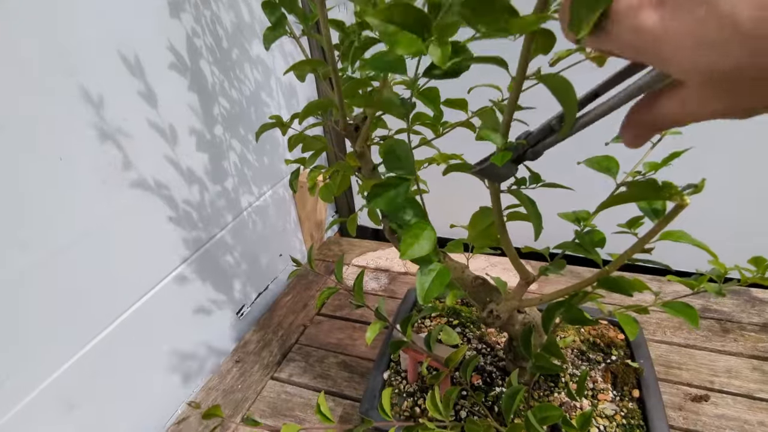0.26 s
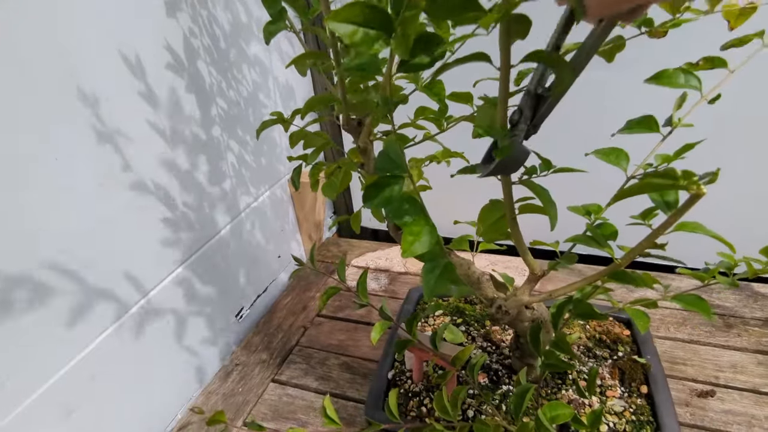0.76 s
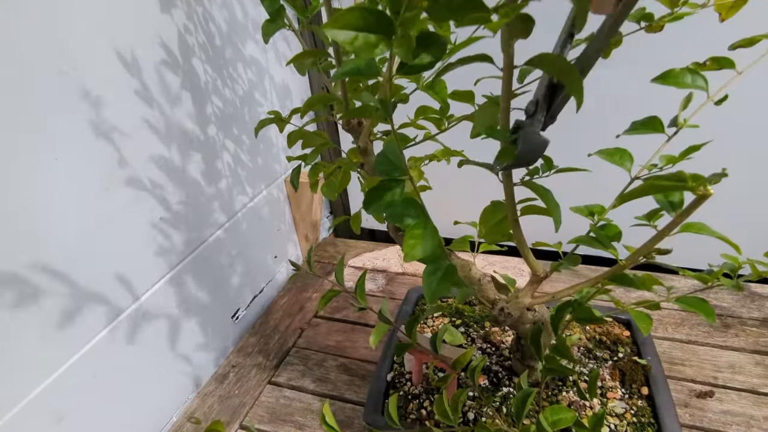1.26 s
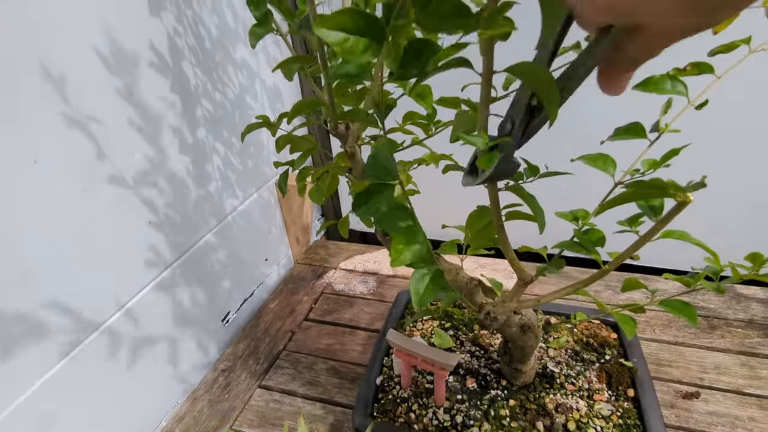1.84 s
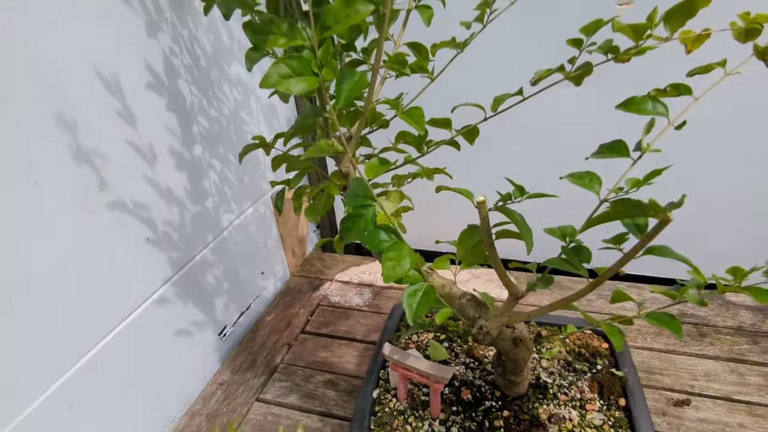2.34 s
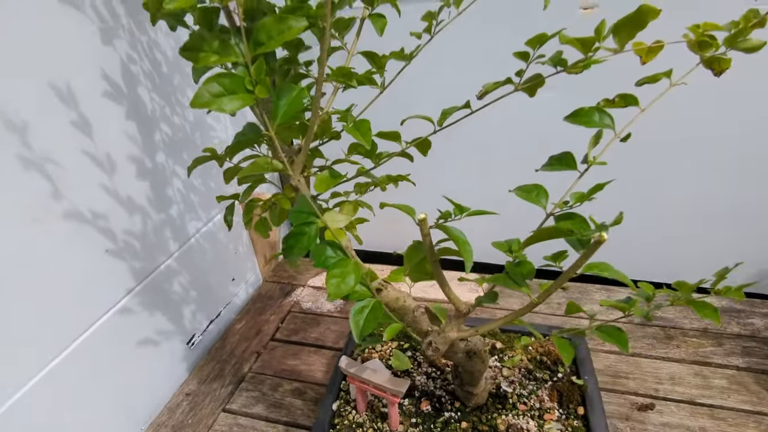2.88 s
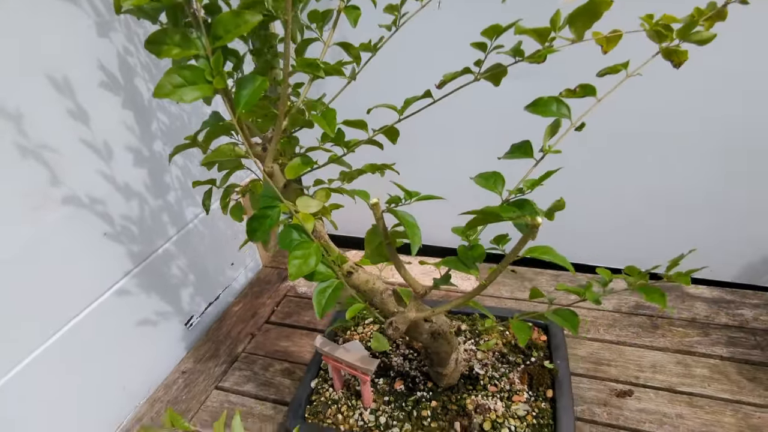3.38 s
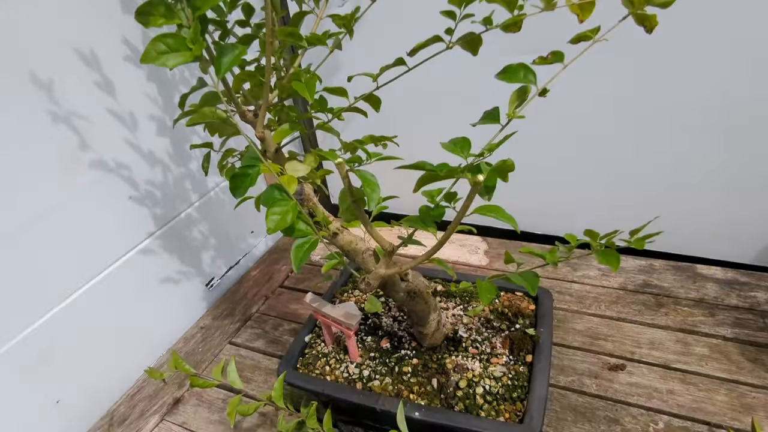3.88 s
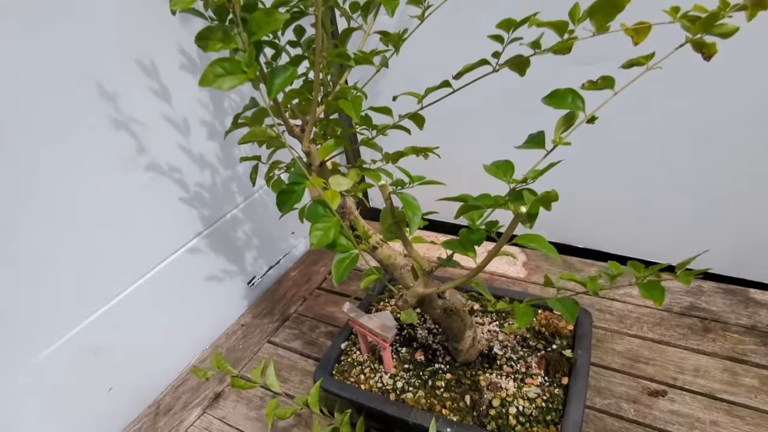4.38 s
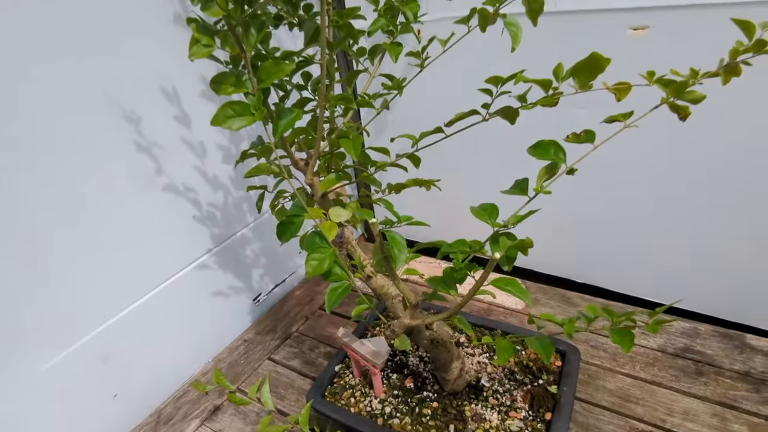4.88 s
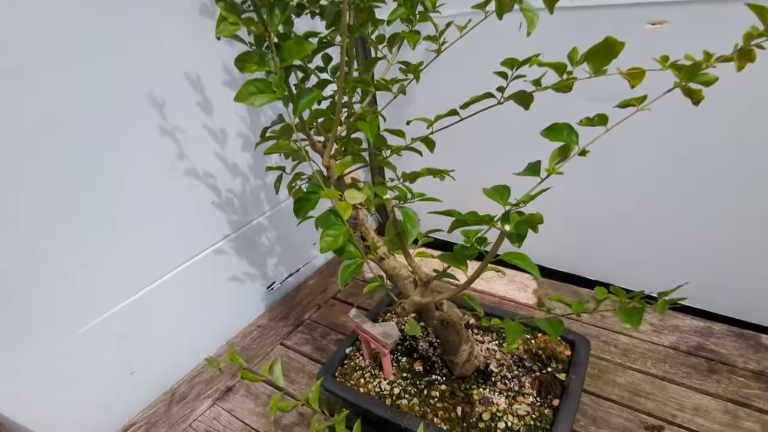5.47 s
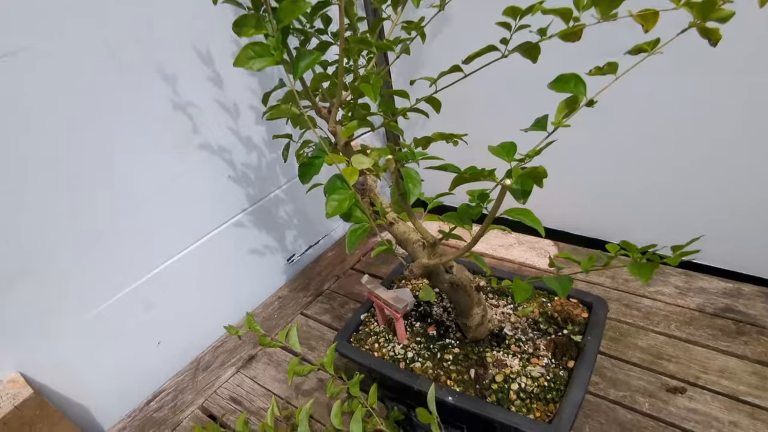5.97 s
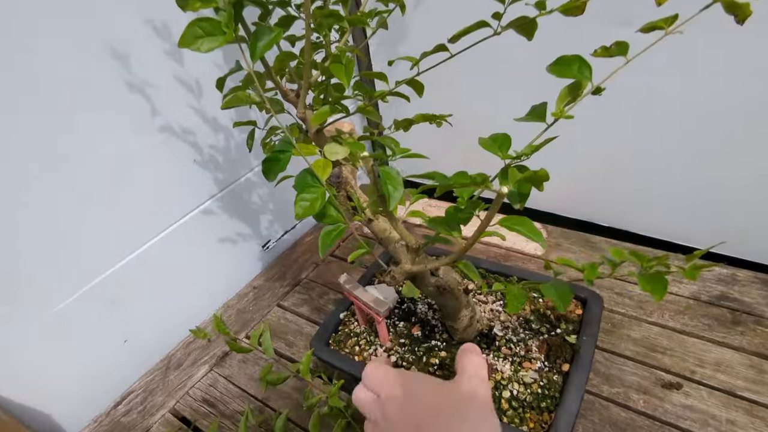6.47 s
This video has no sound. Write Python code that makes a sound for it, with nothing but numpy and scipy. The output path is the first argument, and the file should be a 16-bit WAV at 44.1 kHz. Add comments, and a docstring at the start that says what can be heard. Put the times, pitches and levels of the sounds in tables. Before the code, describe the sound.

Quiet garden pruning: soft leaf brushing, a single crisp crack of steel cutters, a rustling branch drop, then a dull thud and a clattering double wooden knock.

```python
"""Pruning a bonsai

Steel cutters snip a branch on a wooden deck beside a wall: impulses and noise bursts, then ringing modes.
Leaves rustle as the branch is drawn out and dropped, and an arm swishes: filtered noise in smooth envelopes.
The cutters are put down with a thud, a hard knock and a bounce, which excite decaying board modes.
Small damped ticks come before and after; faint hollow hums and high whistles fall over a low, swelling air."""
import sys
import numpy as np
from scipy import signal
from scipy.fft import rfft, irfft
from scipy.io import wavfile
from scipy.ndimage import uniform_filter1d, map_coordinates

SR = 44100
rng = np.random.default_rng(int(sys.argv[2]) if len(sys.argv) > 2 else 0)


def unload_wav(signal):
    """Save mono or channel-first audio to the path in sys.argv[1] as 16-bit WAV at rate SR, clipped to [-1, 1]."""
    wavfile.write(
        sys.argv[1],
        SR,
        np.round(np.clip(np.atleast_2d(signal).T, -1, 1) * 32767).astype(np.int16),
    )


N = 296787
SIDES = np.array([[1], [-1]])  # left, right


def snip(crack_db=-4, tear_db=0, splinter_db=-4, lead_db=-20, lead_s=0.0072, pan_db=1):
    """Brittle fracture: the wood cracks and tears at once; jaws and stem then ring freely."""
    # the branch parts in quick cracks: t/s, relative level/dB
    cracks = [(1.8433, 0), (1.8449, -2), (1.848, -10)]
    # spectrum of breaking wood: f/Hz, level/dB
    crack_colour = [(150, -32), (500, -20), (900, -7.5), (1900, 0), (4200, -8.5), (6000, -0.5), (9000, -10),
                    (10800, -5.5), (11900, 3.5), (13700, -2.5), (14600, 2.5), (16000, -14)]
    # steel jaws and springing stem: f/Hz, level/dB, t60/s, left minus right before the overall pan/dB
    snip_modes = [(232, -36.5, 0.11, 1), (3100, -38, 0.05, -3.5), (5660, -31, 0.046, 4.5),
                  (11880, -17.5, 0.025, 3)]
    t, hz = clock()
    out = np.zeros((2, N))
    colour = amp(read(crack_colour, hz))
    tear, splinter, onset = np.exp(-t / np.array([[.0012], [.005], [.0003]]))  # decay times in s
    fade = amp(tear_db) * unit(tear) + amp(splinter_db) * unit(splinter)
    for s, db in cracks:
        fibres = fade * rng.standard_normal((2, len(t))) / np.sqrt(len(t))
        snap = amp(crack_db) * (t == 0)
        add(out, s, amp(db) * causal(snap + fibres, colour))
    first_s = cracks[0][0]
    rise = unit(np.exp(-t[::-1] / lead_s))
    lead = rise * rng.standard_normal((2, len(t))) / np.sqrt(len(t))  # faint hiss just ahead of the snip
    add(out, first_s - t[-1], amp(lead_db) * causal(lead, colour))
    add(out, first_s, ringing(snip_modes, lag=.00005) * (1 - onset))
    return out * amp(pan_db * SIDES)


def knocks(push_db=17.5, wash_db=14.0, lag=0.00016, low_cut_hz=90, clink_s=0.012, clink_pan_db=0.5, grit_db=3):
    """Impact excitation: each blow rings the same deck modes with a fresh wash and a gritty steel clink."""
    # a hard knock and a bounce, each with quick weaker returns:
    # t/s, relative wood level/dB, contact cut-off f/Hz, clink level/dB
    blows = [(5.035, 3.5, 1270, -35), (5.0379, -9.5, 2440, -45.5), (5.049, -7.5, 2010, -62),
             (5.101, -4, 1260, -42), (5.1051, -13, 3400, -59)]
    # boards under the cutters: f/Hz, level/dB, t60/s, left minus right/dB
    deck = [(65, -36.5, 0.7, -0.5), (175, -27.5, .25, -2), (226, -28.5, 0.25, -3), (302, -22.5, 0.11, -2.5),
            (354, -26, 0.13, -6), (394, -25.5, .09, 4), (454, -27.5, 0.1, 2), (516, -26, 0.066, 2),
            (620, -22, 0.15, -8), (774, -27, .07, 8.5), (808, -27, 0.11, 7.5), (963, -22.5, 0.1, -5.5),
            (1055, -22, 0.078, -3.5), (1155, -24, .083, 8.5), (1260, -17, 0.043, 0.5),
            (1363, -15, 0.071, -5), (1520, -24, 0.092, -2), (1690, -14.5, 0.06, -2), (1840, -21, 0.085, 7),
            (1900, -18, 0.079, 3)]
    # spectrum of the steel clink: f/Hz, level/dB
    clink_colour = [(1500, -11), (2700, 5), (4300, 5.5), (5000, -4.5), (5800, 3.5), (9000, -14.5),
                    (12000, -6.5), (16000, -21)]
    t, _ = clock()
    out = np.zeros((2, N))
    modes = ringing(deck, lag)
    for s, db, contact_hz, clink_db in blows:
        wood = struck(modes, push_db, wash_db)
        roughness = unit(uniform_filter1d(rng.standard_normal(len(t)), size=60))
        grit = unit(amp(grit_db * roughness))
        clink = noise(clink_colour, len(t)) * grit * np.exp(-t / clink_s)
        clink = clink * amp(clink_db + clink_pan_db * SIDES)
        add(out, s, contact(wood, db, contact_hz, low_cut_hz) + clink)
    return from_right(out, late_s=0.0001)


def thud(db=-2.0, contact_hz=560, low_cut_hz=130, push_db=5, wash_db=7.5, lag=0.00018):
    """Soft impact: a low contact cut-off dulls the blow, and all modes of one board start in one polarity."""
    # the board: f/Hz, level before a gradual weakening down the list/dB, t60/s, left minus right/dB
    thud_board = [(77, -23, 0.18, 0.5), (155.4, -37.5, 0.34, -5.5), (251.7, -30.5, 0.24, 3.5),
                  (318, -24, 0.17, -0.5), (380, -23, .06, 4), (409, -24.5, 0.085, -6), (442, -24, .09, 0),
                  (529.5, -27.5, 0.089, 1), (605, -30, 0.15, -10), (650, -23.5, 0.096, -4)]
    thud_s = 4.5641
    out = np.zeros((2, N))
    modes = ringing(thud_board, lag, sign=0.94)
    add(out, thud_s, contact(struck(modes, push_db, wash_db), db, contact_hz, low_cut_hz))
    return out


def struck(modes, push_db, wash_db):
    """Modal density: a blow gives a push and separate modes, which crowd into a wash at higher frequencies."""
    # spectrum of push and wash: f/Hz, level/dB
    board_colour = [(20, -44.5), (150, -3), (380, 5.5), (800, 3.5), (1900, 2.5), (2400, -4.5), (3200, -11),
                    (6000, -22), (16000, -19)]
    # decay of the wash: f/Hz, t60/s
    board_ring = [(200, 0.27), (2000, 0.14), (5000, 0.051), (14000, 0.04)]
    wash_hz = 700  # the wash takes over gradually above this
    t, hz = clock()
    wash = amp(wash_db) * causal(tail(board_ring), hz / (hz + wash_hz))
    drive = amp(push_db) * (t == 0) + wash
    return causal(drive, amp(read(board_colour, hz))) + modes


def contact(wood, db, contact_hz, low_cut_hz):
    """Contact time: a softer contact excites less treble; a high-pass keeps the blow lean in the deep bass."""
    _, hz = clock()
    treble_loss = 1 + (hz / contact_hz) ** 4
    bass_loss = 1 + (low_cut_hz / (hz + 1)) ** 4
    return -amp(db) * causal(wood, 1 / np.sqrt(treble_loss * bass_loss))


def ringing(modes, lag, sign=-1):
    """Modal synthesis: damped sines, by default of alternating sign, differ in phase and level left to right."""
    t, _ = clock()
    out = np.zeros((2, len(t)))
    for k, (hz, db, t60, pan_db) in enumerate(modes):
        shifted = t + lag * SIDES * (-1) ** (k // 2)  # the leading side changes every two modes
        decay = np.exp(-np.log(1000) * t / t60)
        level = sign ** k * amp(db + SIDES * pan_db / 2)
        out += level * decay * np.sin(2 * np.pi * hz * shifted)
    return out


def leaves(gain_db=0, flutter_db=2, brush_rush_db=-10, slide_rustle_db=-3, slide_rush_db=-2):
    """Stochastic contact noise: many tiny leaf impacts over a hiss, in uneven clumps; slides add a lower rush."""
    # whole leaves slide as the branch is drawn out and laid down: start t/s, length/s, relative level/dB
    slides = [(2.1, 2.28, -81), (3.17, 0.51, -66), (3.46, 0.53, -62.5), (5.34, 0.22, -81), (5.6, 1.53, -77)]
    # spectrum of the leaf contacts: f/Hz, level/dB
    leaf_colour = [(500, -22.5), (1500, -6), (3200, -10.5), (5000, -11), (7000, -5), (10000, -3),
                   (13000, -0.5), (15500, -8)]
    # spectrum of the rush: f/Hz, level/dB
    slide_colour = [(800, -17.5), (2500, -3.5), (4200, -4), (6500, -1), (9000, -8.5), (16000, -27)]
    stir_db = -102  # the foliage is never quite still
    hz = np.fft.rfftfreq(N, 1 / SR)
    brush, slide = brushes(), sweeps(slides, skew=0.74, sharpness=1.88)
    contacts = rng.random(N) < 3000 / SR  # 3000 per second on average
    sizes = contacts * amp(3.5 * np.minimum(rng.exponential(1, N), 4))
    grains = rng.standard_normal((2, N)) * (.4 + sizes)  # .4 is the steady hiss
    clumps = uniform_filter1d(uniform_filter1d(rng.standard_normal(N), size=1400), size=500)
    rustle = unit(irfft(rfft(grains) * amp(read(leaf_colour, hz)), N))
    rustle = rustle * (np.hypot(brush, amp(slide_rustle_db) * slide) + amp(stir_db))
    rush = noise(slide_colour, N) * np.hypot(amp(brush_rush_db) * brush, amp(slide_rush_db) * slide)
    return patchy(rustle + rush, depth_db=2) * amp(gain_db + flutter_db * unit(clumps) + .5 * SIDES)


def brushes():
    """Envelope of intermittent contact: each leaf flick swells, holds and settles; overlapping powers add."""
    # leaves flicked by cutters, hand or branch: start t/s, contact length/s, relative level/dB
    flicks = [(0.42, 0.042, -72), (0.784, 0.078, -67), (1.016, 0.11, -66), (1.293, 0.0051, -69.5),
              (1.538, 0.1, -68.5), (1.687, .4, -67.5), (1.789, 0.035, -55), (2.057, 0.019, -59.5),
              (2.137, 0.036, -63.5), (2.351, 0.022, -69.5), (2.447, 0.035, -66.5), (2.669, 0.1, -61),
              (2.696, 0.031, -45.5), (2.8, 0.26, -70.5), (3.16, 0.0082, -64.5), (4.962, 0.014, -78),
              (5.735, 0.041, -61.5), (6.557, 0.029, -62.5), (6.599, 0.1, -68.5)]
    attack_s, release_s = 0.009, 0.017
    t = np.arange(N) / SR
    power = np.zeros(N)
    for s, length, db in flicks + grazes():
        near = slice(round(s * SR), round((s + length + .5) * SR))
        age = np.maximum(t[near] - s, 0)
        attack = np.tanh(age / attack_s)
        release = np.exp(-np.maximum(age - length, 0) / release_s)
        power[near] += (amp(db) * attack * release) ** 2
    return np.sqrt(power)


def grazes(count=40):
    """Random point process: single leaves touched unevenly while the jaws are threaded in, as brush rows."""
    threading_s, grazes_per_s = 0.91, 27
    graze_s, graze_db, spread_db = 0.013, -84, 5
    rows = []
    for k, (late, force) in enumerate(rng.uniform(-0.67, 1, (count, 2))):
        s = (k + abs(late)) / grazes_per_s
        if s < threading_s:
            rows.append((s, graze_s, graze_db + spread_db * force))
    return rows


def swish(gain_db=2.0):
    """Friction noise: the soft rubbing of the moving arm follows the speed of each stroke."""
    # strokes of the arm: start t/s, length/s, level before the gain/dB
    strokes = [(-.1, 0.64, -69.5), (1.74, 0.34, -68), (2.65, 0.36, -67), (3.14, 0.29, -69),
               (3.53, 0.64, -72), (4.12, 0.2, -70), (4.3, 2.96, -69.5), (5.68, 1.25, -65.5)]
    # spectrum of the rubbing: f/Hz, level/dB
    swish_colour = [(200, 0), (600, 7.5), (1500, 6.5), (2600, -3), (4000, -6), (16000, -40.5)]
    sleeve_db = -82.5  # rubbing between the strokes, before the gain
    strength = np.hypot(sweeps(strokes, skew=0.76, sharpness=0.94), amp(sleeve_db))
    return patchy(noise(swish_colour, N), depth_db=2.5) * amp(gain_db) * strength


def sweeps(rows, skew, sharpness):
    """Speed-dependent friction: each movement speeds up and slows in one arch; skew under 1 peaks early."""
    t = np.arange(N) / SR
    power = np.zeros(N)
    for s, length, db in rows:
        progress = np.clip((t - s) / length, 0, 1)
        speed = abs(np.sin(np.pi * progress ** skew))
        power += (amp(db) * speed ** sharpness) ** 2
    return np.sqrt(power)


def patchy(x, depth_db):
    """Random time-frequency modulation: random patches raise and lower a rubbed sound."""
    patch_s, patch_hz = 0.03, 260  # size of the random patches in time and frequency
    hz, t, z = signal.stft(x, SR, nperseg=512)
    cells = rng.standard_normal((400, 800))
    grid = np.meshgrid(hz / patch_hz, t / patch_s, indexing="ij")
    field = unit(map_coordinates(cells, grid, order=1, mode="mirror"))
    return signal.istft(z * unit(amp(depth_db * field)), SR, nperseg=512)[1][:, :N]


def ticks(scatter_s=0.0023, gain_db=21, damping_hz=1400, skirt_db=-16):
    """Damped resonance: a tap and its scatter excite one peak on a broad skirt; low taps ring longer."""
    # light taps of twigs and fingers: t/s, level before the gain/dB, centre f/Hz, left minus right/dB
    taps = [(0.0493, -39, 880, 1), (1.1397, -35, 810, -1), (5.53, -53, 2220, 7), (5.743, -42, 1480, -2),
            (5.832, -45, 1310, -4), (5.9666, -32.5, 1940, 19), (5.991, -42.5, 1490, 5),
            (6.05, -47, 1590, 7), (6.125, -48.5, 1900, 8)]
    t, hz = clock(size=2048)
    out = np.zeros((2, N))
    for s, db, centre_hz, pan_db in taps:
        scatter = rng.standard_normal((2, len(t))) * np.exp(-t / scatter_s)
        burst = unit(scatter) / np.sqrt(len(t))
        ratio = (hz + 1) / centre_hz
        detune = ratio - 1 / ratio
        width = (centre_hz / damping_hz) ** 2
        peak = 1 / (1 + (detune / width) ** 2) ** 2.4
        skirt = amp(skirt_db) / np.hypot(1, detune / 2)
        tap = causal((t == 0) + .5 * burst, peak + skirt)
        add(out, s, tap * amp(gain_db + db + pan_db * SIDES / 2))
    return out


def yard(x, wet_db=-25, wall_db=-21, wall_s=0.009, spread_s=0.014):
    """Reflection and reverberation: the wall returns a scattered echo dulled by foliage; a faint tail follows."""
    # decay of the yard: f/Hz, t60/s
    yard_ring = [(200, 0.21), (2500, 0.14), (8000, 0.085), (15000, 0.074)]
    wall_colour = [(1500, -3), (3000, 1.5), (6000, -8.0), (16000, -13.5)]  # f/Hz, level/dB
    t, _ = clock()
    scatter = np.exp(-abs(t - wall_s) / spread_s)
    wall = unit(noise(wall_colour, len(t)) * scatter) / np.sqrt(len(t))
    echo = amp(wet_db) * tail(yard_ring) + amp(wall_db) * wall
    return x + signal.fftconvolve(x, echo, axes=1)[:, :N]


def hums_and_whistles(blur=0.11):
    """Narrow-band modulation: slow noise blurs each falling tone by a share of its pitch."""
    # faint hollow hums, and high whistles: start t/s, length/s, start f/Hz, end f/Hz, relative level/dB
    tones = [(0.197, 0.19, 1230, 1182, -65), (0.449, 0.54, 557.5, 555, -64), (1.271, 0.26, 945, 902, -72.5),
             (2.693, 0.37, 548.5, 512, -62.5), (2.878, 0.061, 4100, 3480, -71),
             (5.604, 0.086, 4346, 2900, -75.5), (5.752, 0.052, 3100, 2420, -62)]
    out = np.zeros((2, N))
    for s, length, start_hz, end_hz, db in tones:
        t = np.arange(0, length, 1 / SR)
        lowpass = signal.butter(2, blur * start_hz, fs=SR, output="sos")
        waver = signal.sosfilt(lowpass, rng.standard_normal((2, SR)))[:, :len(t)]
        waver = unit(waver + waver[::-1] / 2)  # each side shares some of the other
        turns = np.cumsum(start_hz + (end_hz - start_hz) * t / length) / SR
        tone = np.sin(2 * np.pi * turns) * signal.windows.tukey(len(t), .5)
        add(out, s, amp(db) * waver * tone)
    return out


def air(swell_db=1.38):
    """Amplitude-modulated noise: twenty slow sines swell the low background of the garden."""
    # spectral density of the background: f/Hz, relative level/dB
    air_colour = [(20, -32), (35, -6.5), (60, 2), (135, -0.5), (200, -13), (260, -8.5), (500, -16),
                  (700, -21), (900, -16.5), (1800, -27.5), (4000, -45.5), (16000, -55.5)]
    air_db = -62
    t = np.arange(N) / SR
    swell = unit(sum(np.sin(2 * np.pi * (f * t + rng.random())) for f in np.geomspace(.5, 8, 20)))
    return noise(air_colour, N) * amp(air_db + swell_db * swell)


def noise(colour, size):
    """Interchannel coherence: coloured noise, scaled to rms 1, whose two sides agree most in the bass."""
    # left-right likeness: f/Hz, correlation (1 is identical)
    alike = [(100, 0.97), (300, .8), (600, 0.59), (1100, 0.014), (2500, 0.33), (16000, 0.074)]
    hz = np.fft.rfftfreq(size, 1 / SR)
    mid, side = rfft(rng.standard_normal((2, size)))
    same = np.clip(read(alike, hz), -1, 1)
    mid, side = mid * np.sqrt(1 + same), side * np.sqrt(1 - same)
    return unit(irfft(np.array([mid + side, mid - side]) * amp(read(colour, hz)), size))


def tail(ring, size=16384):
    """Exponential decay: a dense echo of mean channel energy 1 in which each band dies at its own speed."""
    hz, t, z = signal.stft(noise([(1, 0)], size), SR, nperseg=256)
    decay = amp(-60 * t / read(ring, hz)[:, None])
    echo = signal.istft(z * decay, SR, nperseg=256)[1][:, :size]
    return unit(echo) / np.sqrt(size)


def from_right(x, late_s):
    """Time-difference stereo: sound from a source on the right reaches the left side a moment later."""
    hz = np.fft.rfftfreq(N, 1 / SR)
    left = irfft(rfft(x[0]) * np.exp(-2j * np.pi * hz * late_s), N)
    return np.array([left, x[1]])


def causal(x, gain):
    """Minimum phase: colours x by a gain per frequency, with nothing ahead of the attack."""
    log_gain = np.log(np.maximum(np.r_[gain, gain[-2:0:-1]], 1e-5))
    response = np.exp(np.conj(signal.hilbert(log_gain)))[:len(gain)]
    return signal.fftconvolve(x, irfft(response)[None], axes=1)[:, :x.shape[1]]


def amp(db):
    """Decibel law: level in dB to amplitude ratio."""
    return 10 ** (np.asarray(db) / 20)


def unit(x):
    """Normalization: scales to an rms of 1."""
    return x / np.sqrt(np.mean(x ** 2) + 1e-20)


def read(points, hz):
    """Logarithmic pitch scale: interpolates a table of (f, value) over log frequency."""
    f, value = np.transpose(points)
    return np.interp(np.log(hz + 1), np.log(f + 1), value)


def add(mix, s, sound):
    """Superposition: adds a sound to the mix from time s, cut at the end of the mix."""
    part = mix[:, round(s * SR):][:, :sound.shape[1]]
    part += sound[:, :part.shape[1]]


def clock(size=16384):
    """Discrete sampling: times in s and frequencies in Hz of one short sound."""
    return np.arange(size) / SR, np.fft.rfftfreq(size, 1 / SR)


def scene():
    """Superposition: snip, thud and knocks echo off the wall; the small sounds stay dry."""
    return yard(snip() + thud() + knocks()) + ticks() + leaves() + swish() + air() + hums_and_whistles()


def record(dry):
    """Band limitation: the recorder's low-pass filter removes the highest treble."""
    edge_hz = 15950
    lowpass = signal.firwin(255, edge_hz, window=("kaiser", 9), fs=SR)
    return signal.oaconvolve(dry, lowpass[None], "same")


dry = scene()
out = record(dry)
unload_wav(out)
```